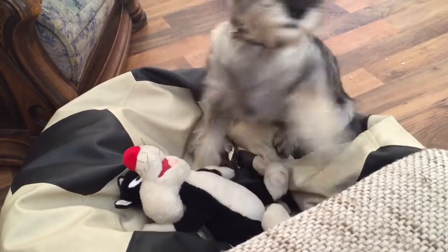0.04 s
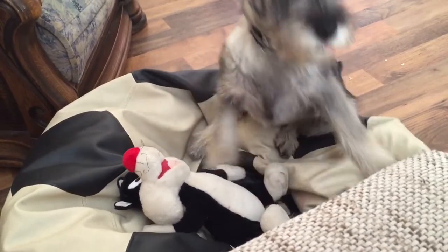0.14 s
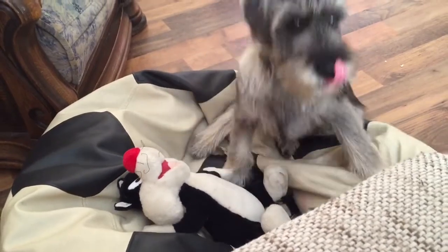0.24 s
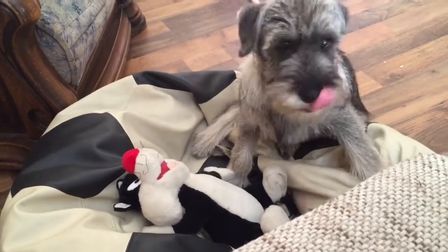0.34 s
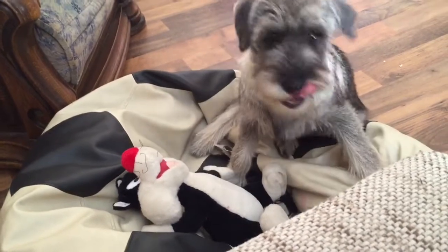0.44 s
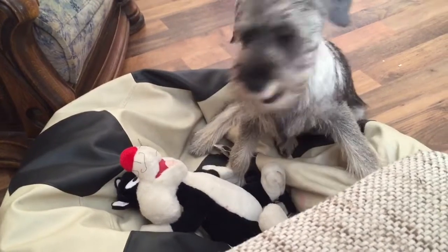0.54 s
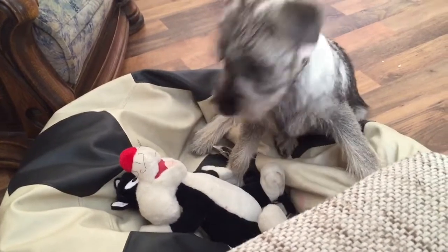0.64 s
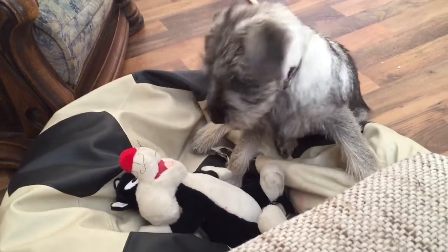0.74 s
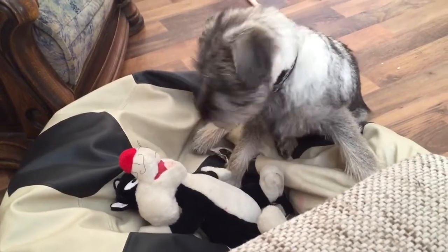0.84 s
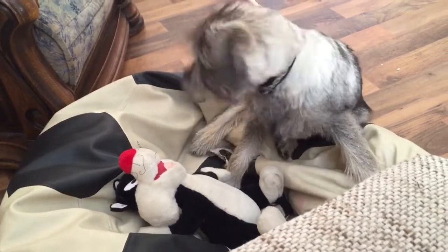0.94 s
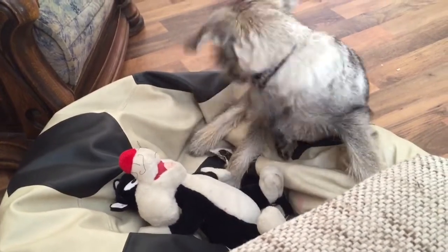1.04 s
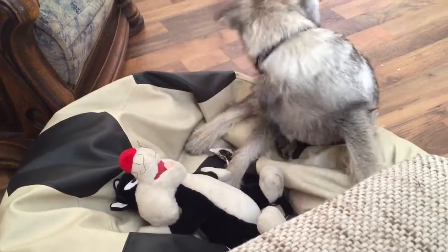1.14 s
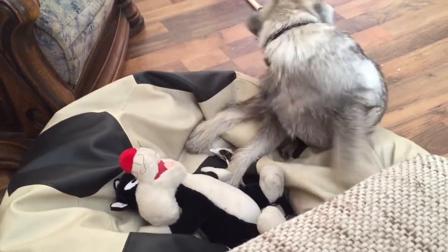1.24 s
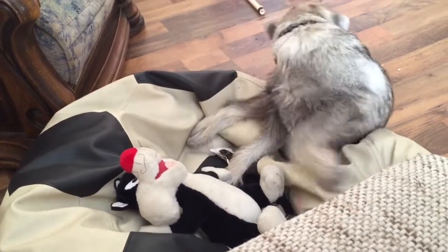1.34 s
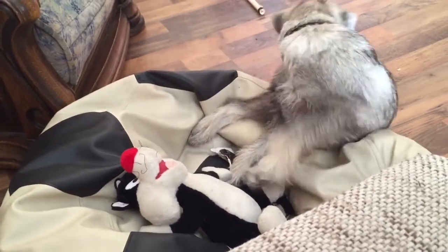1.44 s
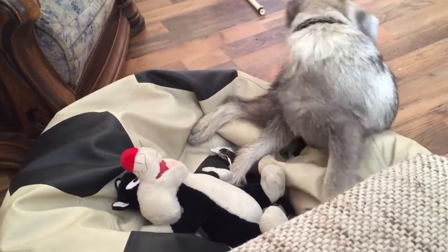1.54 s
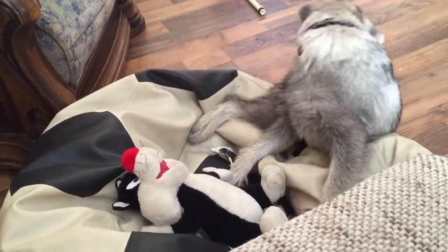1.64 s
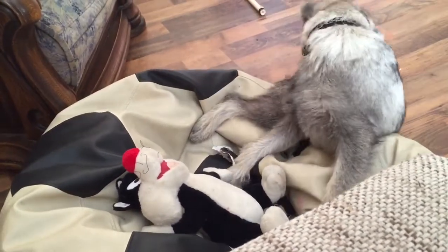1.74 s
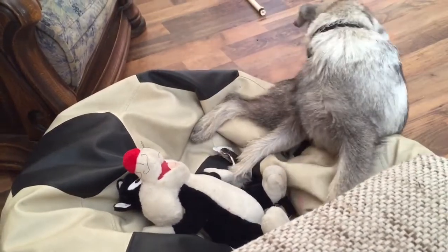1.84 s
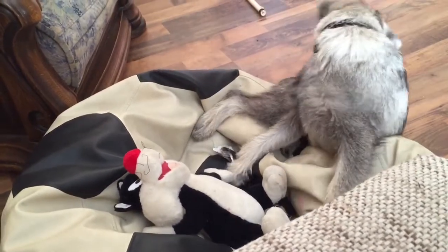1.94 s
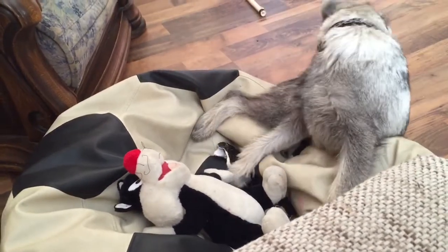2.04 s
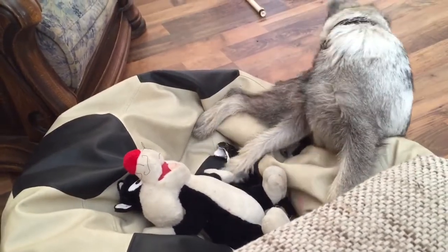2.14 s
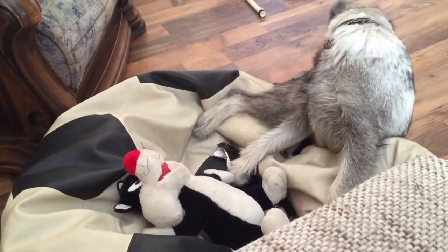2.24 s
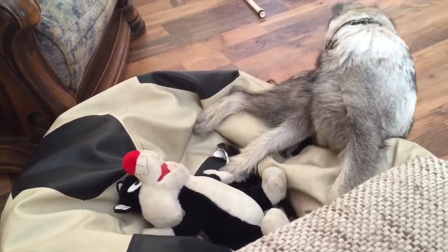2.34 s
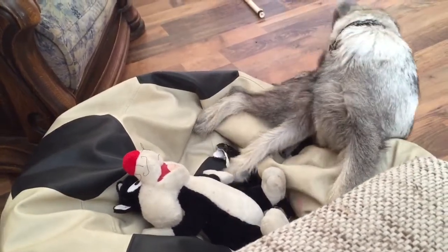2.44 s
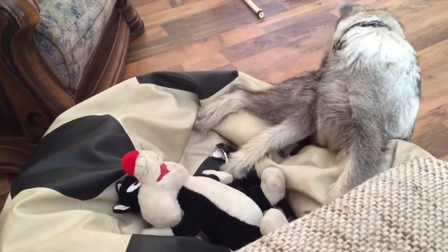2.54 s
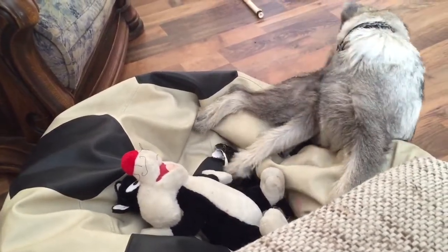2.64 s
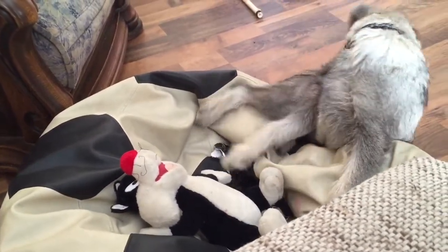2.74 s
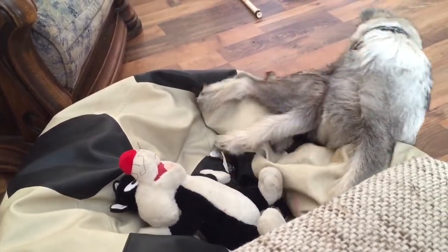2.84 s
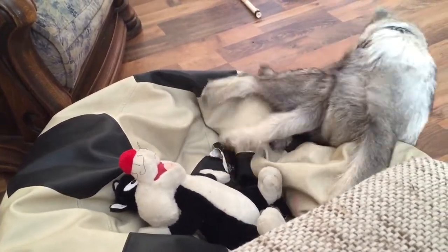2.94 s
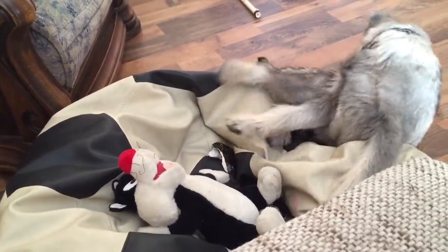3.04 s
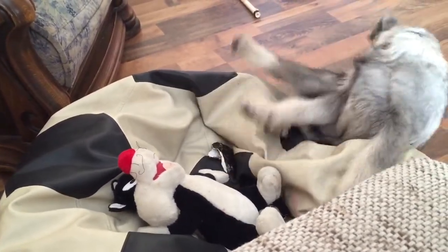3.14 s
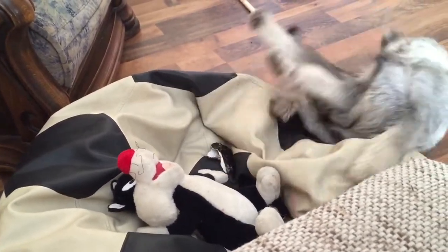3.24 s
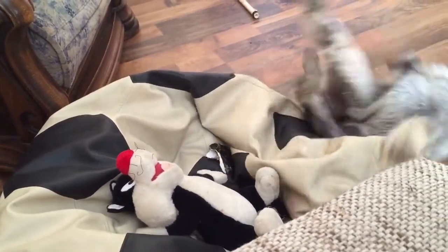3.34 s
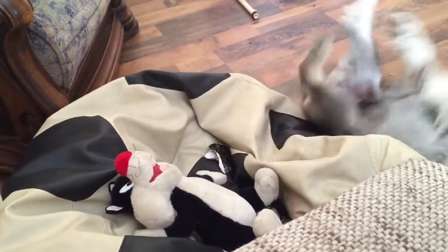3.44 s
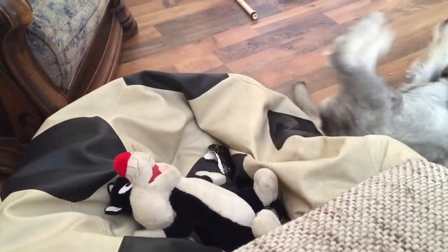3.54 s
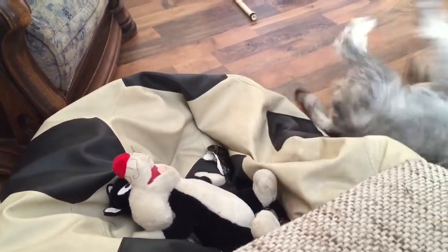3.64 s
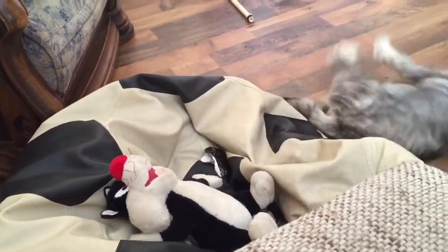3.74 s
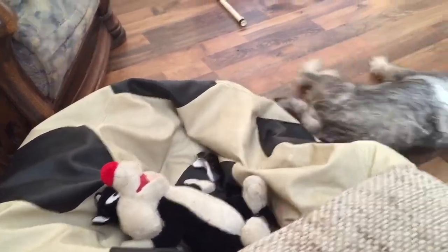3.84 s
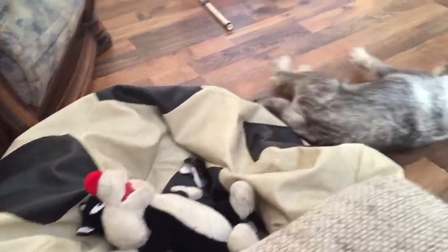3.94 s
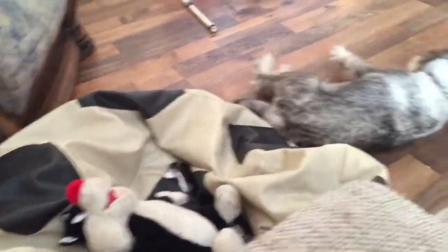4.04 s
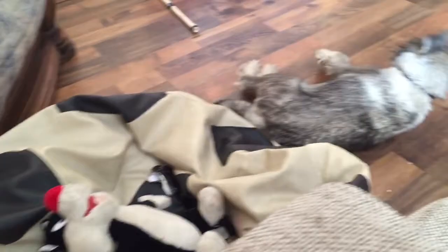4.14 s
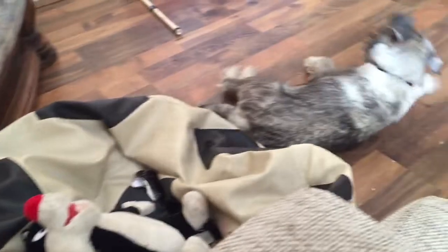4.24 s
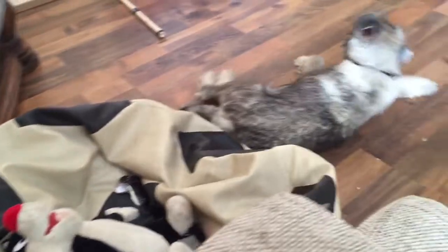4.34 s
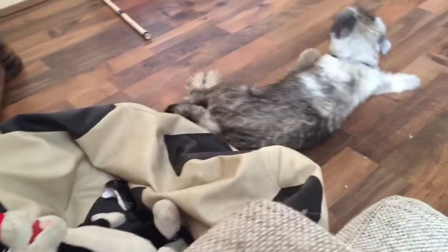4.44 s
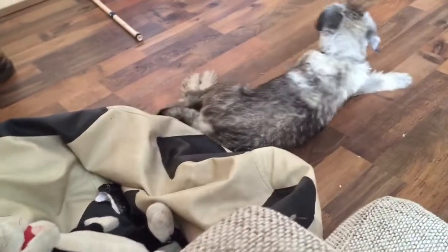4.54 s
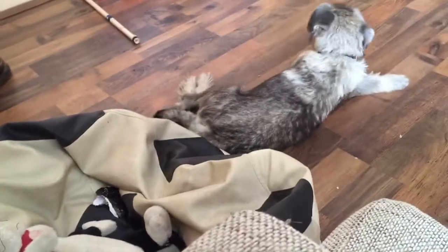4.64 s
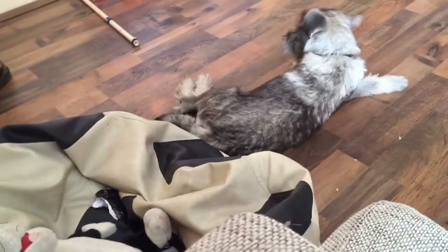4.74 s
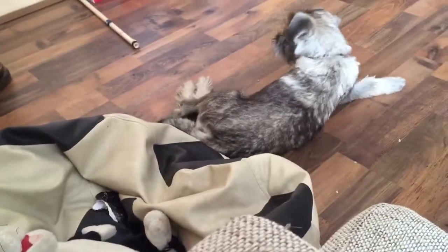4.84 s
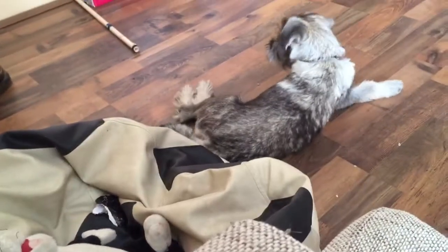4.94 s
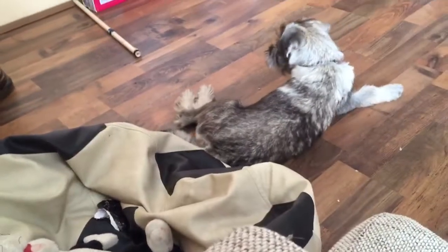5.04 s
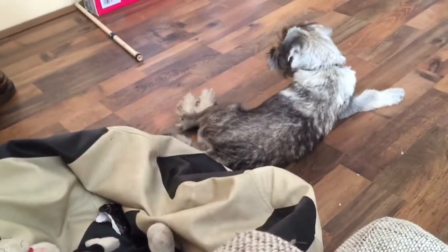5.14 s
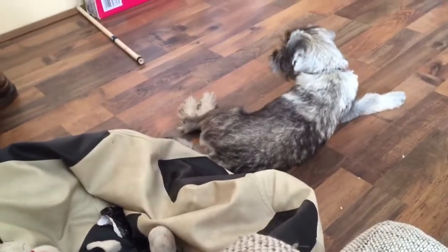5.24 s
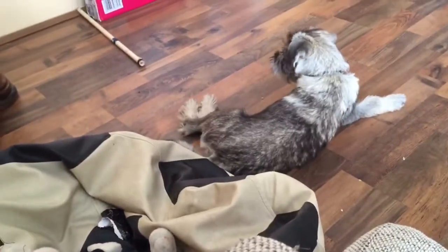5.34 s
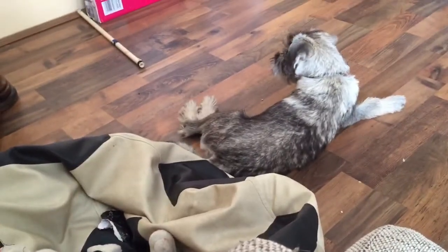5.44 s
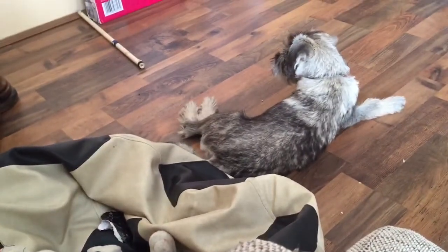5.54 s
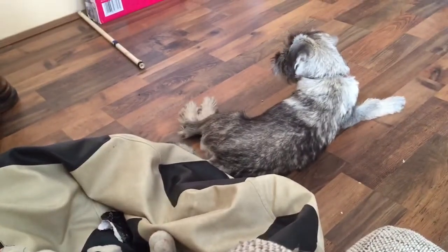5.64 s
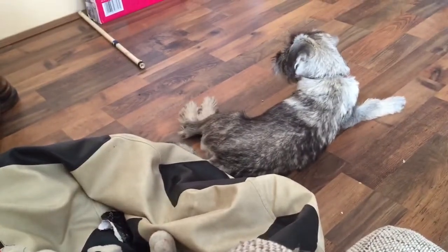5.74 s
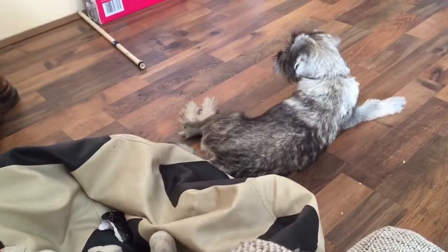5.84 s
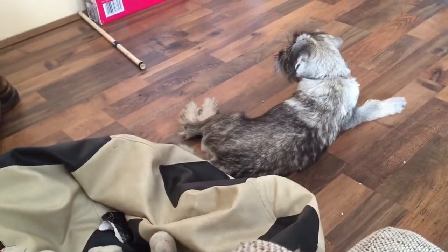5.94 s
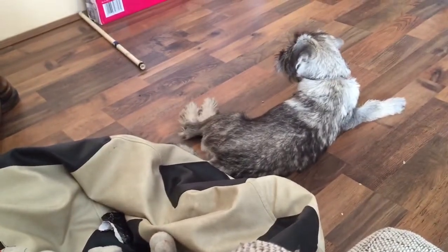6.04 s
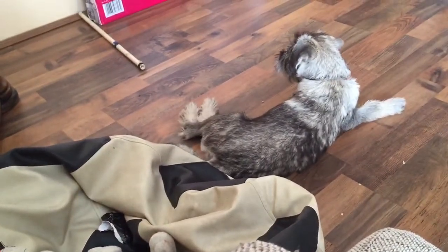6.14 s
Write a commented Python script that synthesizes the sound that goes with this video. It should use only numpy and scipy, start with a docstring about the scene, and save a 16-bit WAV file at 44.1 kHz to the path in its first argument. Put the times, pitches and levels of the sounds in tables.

```python
"""In a living room, a puppy shuffles about on a fabric bean bag, then drops onto the wooden floor.
Shaped noise and scattered tiny clicks make the sliding rub and the crunch of the filling; a sliding tone
makes a faint squeak. The landing is two knocks, built from short swings and ringing boards.
Light claw ticks follow: sharp noise with high pings. A soft coat swish, a faint hum and hiss lie underneath."""
import sys
import numpy as np
from scipy import signal
from scipy.fft import rfft, irfft
from scipy.io import wavfile

SR = 44100
rng = np.random.default_rng(int(sys.argv[2]) if len(sys.argv) > 2 else 0)


def int16_out(signal):
    """Quantize to a 16-bit WAV file."""
    q = np.round(np.clip(np.atleast_2d(signal).T, -1, 1) * 32767)
    wavfile.write(sys.argv[1], SR, q.astype(np.int16))


N = 273331
TIME = np.arange(N) / SR   # seconds

# Levels here are starting levels; the functions below mix them further.
# t60_s is the time a sound takes to fade by 60 dB. Spectra are relative: they set only the colour.

# Each move makes a sliding rub, on the cover and in the last row on the floor:
# start_s, attack_s, hold_s, rub_t60_s, rub_db, rasp_db
STROKES = [(-.02, 0.0083, 0.0059, 1.27, -51.5, -64), (0.213, 0.022, 0.18, 0.77, -49.5, -57.5),
           (0.542, .04, 0.021, 0.23, -58, -93.5), (0.705, 0.082, 0.1, 0.47, -55.5, -71.5),
           (1.185, 0.21, 0.056, 0.73, -52, -64.5), (1.448, .05, .015, 0.41, -58, -63.5),
           (1.62, 0.023, .06, 0.32, -53, -61.5), (1.926, 0.088, 0.051, 0.22, -63.5, -74.5),
           (2.36, 0.033, .02, 0.21, -68, -73), (2.564, .03, 0.023, 0.49, -63, -76),
           (2.805, 0.063, .08, 0.45, -54, -64.5), (3.05, 0.0099, 0.06, 2, -57, -72),
           (3.145, 0.12, 0.066, .8, -53.5, -65.5), (3.34, 0.054, 0.091, 0.79, -51.5, -63.5),
           (4.165, 0.047, 0.23, .8, -77, -81.5)]
RASP_RELEASE = 0.66   # the rasp dies sooner than the rub: share of its t60
HEAVE_DB, FUR_DB = -12, -13   # the heaving against the rub; fur's hiss against the rasp
# Fur brushing, on the cover and at last on the floor: start_s, hold_s, level_db
BRUSHES = [(0.292, .03, -59), (.42, .03, -70), (1.608, 0.0091, -62), (2.06, .01, -70.5), (2.377, .01, -81),
           (2.845, 0.038, -64), (3.078, 0.025, -75), (4.36, .015, -75)]
BRUSH_ATTACK_S, BRUSH_T60_S = 0.031, 0.25
# The cover never lies quite still while the puppy is on it
ON_BAG_UNTIL_S, SETTLE_T60_S = 3.6, 3.0
FIDGET_RUB_DB, FIDGET_RASP_DB, FIDGET_FUR_DB = -68.5, -78, -83.5
CRACKLE_DB, CRACKLES_PER_S = -16, 130   # coarse slips of the filling, against the rub
# Colours of the soft rub, its crisp rasp, the fur and the filling: pitch_hz, level_db_per_hz
CLOTH_SPECTRUM = [(150, -5.5), (260, 6), (350, 5.5), (430, 9), (520, -2.5), (660, 2), (1200, -2.5),
                  (2100, -2.5), (2800, -10), (4000, -26), (8000, -29), (14000, -42.5)]
RASP_SPECTRUM = [(1500, -3), (2600, 3), (3900, 4), (5000, -4), (6500, -5), (8000, -18), (14000, -22.5)]
FUR_SPECTRUM = [(1500, -9), (3500, 1.5), (6000, 3), (8500, 5), (10400, -1.5), (12500, 2.5), (15500, 2)]
FILLING_SPECTRUM = [(280, 2.5), (500, 5), (1200, 10.5), (2300, -4.5), (3500, -7.5), (6000, -16.5),
                    (14000, -48)]
# The sofa close by mirrors the rustle: delay_s, level_db
NEAR_ECHOES = [(.0023, -53), (.0061, -16), (0.0137, -13.5)]

# Paws pushing into the bag: start_s, thud_db, thud_pitch_hz, crunch_db, t60_s
PAWS = [(0.2219, -39.5, 240, -42, 0.12), (0.2312, -43, 201, -41, 0.27), (0.3212, -50, 268, -57, 0.51),
        (0.35, -62, 111, -51, 0.2), (1.049, -58, 128, -79, 0.15), (1.205, -54, 110.2, -78, 0.057),
        (1.633, -38.5, 214.3, -38, 0.2), (2.042, -53, 332.6, -64, 0.14), (2.063, -53.5, 330, -62, 0.1),
        (2.586, -75, 300, -65, .08), (3.069, -59, 250, -55.5, 0.09)]
# Colours of the dull thud and of the crunch: pitch_hz, level_db_per_hz
THUD_SPECTRUM = [(30, -34.5), (58, -19), (90, 4), (120, 0), (152, -11), (200, 3), (260, -7), (350, -0.5),
                 (500, -17), (900, -59.5)]
CRUNCH_SPECTRUM = [(185, 14), (340, 12.5), (480, -7), (650, 5.5), (950, 1.5), (1300, -4), (2300, 1.5),
                   (4000, -10.5), (7000, -21), (14000, -68)]

# Folds of the cover snapping taut: start_s, level_db, t60_s
SNAPS = [(0.2228, -56, 0.017), (0.2375, -44, 0.04), (0.3213, -31, 0.022), (0.478, -52, 0.026),
         (0.578, -58, 0.017), (1.127, -73, 0.033), (1.633, -49, 0.044), (2.095, -68, 0.019),
         (3.3324, -58, .015)]
# Colour of a snap: pitch_hz, level_db_per_hz
SNAP_SPECTRUM = [(300, 18), (1000, 9.5), (2300, 0), (4500, 5.5), (8000, -3), (10500, -11), (15000, -4)]
# One faint falling squeak: start_s, length_s, level_db, first_pitch_hz, last_pitch_hz
SQUEAK = (1.99, .1, -70, 1680, 1270)

# Pulses that together build the two knocks on the floor:
# start_s, knock_db, knock_pitch_hz, cycles_to_crest (a count), crack_db, weight_db
LANDING = [(3.5088, -37.5, 920, 0.57, -70, -67.5), (3.5207, -23.5, 710, 0.76, -67.5, -32.5),
           (3.5221, -29, 385, 0.33, -82, -34), (3.535, -39.5, 127, 0.85, -75, -36.5),
           (3.557, -43, 650, 1.3, -48, -47.5), (3.7145, -18, 744, 1.14, -34, -35.5),
           (3.7241, -22, 698, 1, -57, -45), (3.7465, -33, 660, 1.4, -48.5, -44)]
# Low notes of the floor and room: pitch_hz, level_db, t60_s
FLOOR_MODES = [(39.33, -16.5, 1.237), (67.9, -8, 0.138), (86, -10, 0.59), (111, -3, .35),
               (135.4, -9.5, 0.52), (168, -2.5, 0.24), (211.1, -0.5, 0.41), (231, -3.5, 0.33),
               (284.5, 0, 0.26), (306.6, -13, 0.37), (344, -19.5, 0.45), (347, -3.5, .4), (427, -9, 0.34)]
# Ringing notes of the boards: pitch_hz, level_db, t60_s
BOARD_MODES = [(519.5, -2.5, 0.46), (551, -3.5, 0.5), (617, -9.5, 0.48), (660, -15.5, 0.38),
               (694, -18, 0.42), (794, -12, 0.61), (805, -20, 0.48), (830, -16, 0.57), (948, -10, .42),
               (1103, -8.5, 0.402), (1720, -18.5, .4), (1824, -21, 0.38), (2274, -22, 0.497),
               (2397, -21.5, .6)]
# Colours of the sharp crack and of a knock's blurred wooden tail: pitch_hz, level_db_per_hz
CRACK_SPECTRUM = [(900, 3.5), (1350, 2.5), (1700, 4.5), (2000, -7), (2300, 7), (2550, -5.5), (3100, -4.5),
                  (4300, -14), (5500, -23.5), (14000, -45.5)]
WOOD_SPECTRUM = [(250, -8.5), (320, -1.5), (480, -8.5), (550, -2), (670, 5), (760, -3), (950, -8),
                 (1100, -9.5), (1350, -26), (1700, -24), (2000, -45), (2400, -29), (3300, -34),
                 (4500, -35.5), (14000, -65)]
# Furniture and walls throwing the knocks back: delay_s, level_db
ECHOES = [(.0031, -2), (.0055, -14), (.0118, -16.5), (0.0355, -24), (.0485, -37.5)]

# The floor sways as the body rolls across it: start_s, attack_s, hold_s, t60_s, level_db
ROLLS = [(3.46, .1, 0.15, 0.73, -53), (3.8, 0.046, .1, 0.28, -59.5)]
# Colour of the rumble around that sway: pitch_hz, level_db_per_hz
RUMBLE_SPECTRUM = [(33, -14), (42, -0.5), (52, 0.5), (65, -9), (120, -19.5), (400, -63)]
SWAY_HZ, RUMBLE_DB = 39.7, -6   # the floor's deep note; the rumble against it

# The coat slides off the bag and over the boards: start_s, attack_s, hold_s, t60_s, level_db
SWISH = (1.5, .5, 1.94, 4.5, -80.5)
# Colour of that swish: pitch_hz, level_db_per_hz
COAT_SPECTRUM = [(3500, -4), (4900, -8.5), (5700, 1), (7000, -3.5), (8200, 0.5), (9500, 2), (10300, -15),
                 (15000, -24)]

# Claws ticking on the boards: start_s, click_db, ping_db, ping_pitch_hz
CLAWS = [(3.551, -52.5, -55, 3560), (3.563, -53.5, -76, 4250), (3.9029, -50.5, -54.5, 3160),
         (3.9054, -59, -50.5, 4430), (3.9135, -73, -56, 3240), (3.949, -55.5, -68, 5600),
         (3.9553, -52, -49, 4080)]
# Colour of a claw's click: pitch_hz, level_db_per_hz
CLAW_SPECTRUM = [(1000, -2.5), (1600, -8), (2400, -17.5), (3200, -3.5), (3550, -1.5), (3900, 3), (4400, -1),
                 (4950, -9), (5700, -4), (6600, -10.5), (9500, -18), (14000, -33)]

# Fading of the room's reverberation: pitch_hz, t60_s
ROOM_T60 = [(60, 0.4), (250, 0.27), (700, 0.63), (2000, 0.66), (5000, 0.42), (14000, 0.096)]
# Appliance hum: pitch_hz, level_db (rms)
HUM = [(98, -87.5), (199, -78.5)]
# Colour of the still air: pitch_hz, level_db_per_hz
AIR_SPECTRUM = [(15, -54), (25, -18.5), (69, -7), (93, -6.5), (109, 0.5), (131, -13.5), (202, -4),
                (231, -21), (271, -11.5), (373, -17.5), (404, -21), (637, -20), (1060, -24), (1810, -24.5),
                (15000, -36)]
AIR_DB = -69.5
CUTOFF_HZ = 15250


def rustle():
    """Each move rubs in tiny slips, with brushing fur, a low heaving and coarse crackle."""
    fidget = from_db(-60 * np.maximum(TIME - ON_BAG_UNTIL_S, 0) / SETTLE_T60_S)

    rubs = [swell(s, attack, hold, t60, db) for s, attack, hold, t60, db, _ in STROKES]
    rub = together(rubs + [from_db(FIDGET_RUB_DB) * fidget])
    rasps = [swell(s, attack, hold, RASP_RELEASE * t60, db) for s, attack, hold, t60, _, db in STROKES]
    rasp = together(rasps + [from_db(FIDGET_RASP_DB) * fidget])
    sweeps = [swell(s, BRUSH_ATTACK_S, hold, BRUSH_T60_S, db) for s, hold, db in BRUSHES]
    brush = together(sweeps + [from_db(FUR_DB) * rasp, from_db(FIDGET_FUR_DB) * fidget])

    soft_slips = rub * grains(CLOTH_SPECTRUM, per_s=3000, spread_db=0.0)
    crisp_slips = rasp * grains(RASP_SPECTRUM, per_s=3000, spread_db=-1.0)
    catching = flutter(per_s=110, depth_db=1.0)   # the rub sticks and lets go
    rubbing = catching * (soft_slips + crisp_slips)
    crackle = from_db(CRACKLE_DB) * rub * grains(FILLING_SPECTRUM, per_s=CRACKLES_PER_S, spread_db=3)
    sliding = rubbing + crackle

    hairs = grains(FUR_SPECTRUM, per_s=2500, spread_db=3)
    fur = brush * hairs * flutter(per_s=80, depth_db=1.7)
    heaving = from_db(HEAVE_DB) * rub * hiss(THUD_SPECTRUM)
    return sliding + reflections(sliding, NEAR_ECHOES) + fur + heaving


def paws(tail):
    """Each push swings the bag, sends a dull thud into the floor and crunches the filling together."""
    thud_shape = sum(burst(s, db, t60, rise_s=0.011) for s, db, _, _, t60 in PAWS)
    thud = thud_shape * hiss(THUD_SPECTRUM)
    swing = sum(knock(s, db, hz, cycles=0.23) for s, db, hz, _, _ in PAWS)
    floor = ring(sum(click(s, db) for s, db, *_ in PAWS), FLOOR_MODES)
    crunch_shape = sum(burst(s, db, t60, rise_s=0.0008) for s, _, _, db, t60 in PAWS)
    crunch = crunch_shape * grains(CRUNCH_SPECTRUM, per_s=2000, spread_db=5.5)
    push = from_db(0.5) * thud + from_db(4.5) * swing + from_db(-12) * floor
    return push + in_room(crunch, tail, wet_db=-8.5)


def snaps(tail):
    """Folds of cloth pull taut with short sharp bursts of noise."""
    return in_room(ticks(SNAPS, SNAP_SPECTRUM), tail, wet_db=-6.5)


def squeak():
    """A thin tone slides down in pitch as the puppy shifts."""
    s, length, db, first_hz, last_hz = SQUEAK
    along = np.clip((TIME - s) / length, 0, 1)
    hz = first_hz + (last_hz - first_hz) * along
    arch = 2 * np.sqrt(along * (1 - along))   # silent at both ends, full in the middle
    return from_db(db) * arch * np.sin(2 * np.pi * np.cumsum(hz) / SR)


def landing(tail):
    """Pulses together build the two knocks; the body's weight sets the whole floor booming."""
    knocks = sum(knock(s, db, hz, cycles) for s, db, hz, cycles, _, _ in LANDING)
    cracks = ticks([(s, db, 0.025) for s, _, _, _, db, _ in LANDING], CRACK_SPECTRUM)
    # strong pulses set the boards ringing far more than weak ones
    strengths = [(s, 1.76 * db) for s, db, *_ in LANDING]
    boards = ring(sum(click(s, db) for s, db in strengths), BOARD_MODES)
    wood_shape = sum(burst(s, db, t60=0.58, rise_s=0.014) for s, db in strengths)
    wood = wood_shape * hiss(WOOD_SPECTRUM)
    boom = ring(sum(click(s, db) for s, *_, db in LANDING), FLOOR_MODES)
    contact = knocks + in_room(cracks, tail, wet_db=-1.5) + reflections(knocks + cracks, ECHOES)
    return contact + from_db(-6.5) * boards + from_db(-3.0) * wood + from_db(-7.5) * boom


def roll():
    """The rolling weight keeps the floor swaying on a deep note with rumble around it."""
    weight = together([swell(*row) for row in ROLLS])
    drift_rad = 0.2 * np.log(10) * wander(per_s=14)   # makes the note waver
    sway = np.sqrt(2) * np.sin(2 * np.pi * SWAY_HZ * TIME + drift_rad)
    return weight * (sway + from_db(RUMBLE_DB) * hiss(RUMBLE_SPECTRUM))


def claws(tail):
    """Each claw clicks and gives a brief high ping."""
    clicks = ticks([(s, db, 0.028) for s, db, _, _ in CLAWS], CLAW_SPECTRUM)
    pings = sum(knock(s, db, hz, cycles=12.0) for s, _, db, hz in CLAWS)
    return in_room(clicks, tail, wet_db=-4.0) + pings


def coat_swish():
    """The sliding coat is a high noise that slowly swells and dies away."""
    return swell(*SWISH) * hiss(COAT_SPECTRUM)


def appliance_hum():
    """Low steady tones waver a little in phase and level."""
    hum = np.zeros(N)
    for hz, db in HUM:
        drift_rad = 0.65 * np.log(10) * wander(per_s=11)
        hum += from_db(db) * np.sqrt(2) * np.sin(2 * np.pi * hz * TIME + drift_rad)
    return hum * flutter(per_s=9.43, depth_db=1.5)


def still_air():
    """The air is a faint, steady coloured noise."""
    return from_db(AIR_DB) * hiss(AIR_SPECTRUM)


def reverberation():
    """The room's blurred answer to a click: bands of noise, each dying at its own rate; energy 1."""
    age, bands = TIME[:SR], []
    edges = np.geomspace(40, 16000, 10)
    for low, high in zip(edges, edges[1:]):
        band_filter = signal.butter(2, [low, high], "band", fs=SR, output="sos")
        band = signal.sosfilt(band_filter, rng.standard_normal(SR))
        t60 = at_hz(ROOM_T60, np.sqrt(low * high))
        bands.append(band * np.exp(-np.log(1000) * age / t60))
    build_up = 1 - np.exp(-age / 0.0022)
    return rms_one(sum(bands) * build_up) / np.sqrt(SR)


def in_room(x, tail, wet_db):
    """Add the room's reverberation to a sound."""
    return x + from_db(wet_db) * signal.fftconvolve(x, tail)[:N]


def reflections(x, echoes):
    """Nearby surfaces throw a sound back a few times, later and at other levels."""
    return sum(from_db(db) * np.interp(TIME - delay, TIME, x, left=0) for delay, db in echoes)


def knock(s, db, hz, cycles):
    """A pulse swings at its own pitch, swelling quickly and dying away."""
    swing = np.clip((TIME - s) * hz, 0, 20 * cycles)   # cycles since the start
    shape = (swing / cycles * np.exp(1 - swing / cycles)) ** 2   # crest after the given cycles
    return from_db(db) * shape * np.sin(2 * np.pi * swing)


def ring(x, modes):
    """A unit click sets each mode ringing at its own height, signs alternating."""
    out = np.zeros(N)
    for k, (hz, db, t60) in enumerate(modes):
        r = np.exp(-np.log(1000) / (t60 * SR))   # fading per sample
        w = 2 * np.pi * hz / SR                  # turn per sample
        # the tiny offset keeps the filter's numbers away from zero
        mode = signal.lfilter([0, np.sin(w)], [1, -2 * r * np.cos(w), r * r], x + 1e-18)
        out += (-1) ** k * from_db(db) * mode
    return out


def ticks(rows, spectrum):
    """Short sharp contacts are noise with a very quick rise."""
    return sum(burst(s, db, t60, rise_s=0.00025) for s, db, t60 in rows) * hiss(spectrum)


def click(s, db):
    """A click is a single sample."""
    return from_db(db) * (np.arange(N) == round(s * SR))


def burst(s, db, t60, rise_s):
    """A burst's envelope rises quickly and falls exponentially."""
    age = np.clip(TIME - s, 0, 2 * t60)
    return from_db(db) * (1 - np.exp(-age / rise_s)) * np.exp(-np.log(1000) * age / t60)


def swell(s, attack_s, hold_s, t60, db):
    """A movement's envelope gathers speed, holds and dies away."""
    rise = np.clip((TIME - s) / attack_s, 0, 1)
    since_end = np.clip(TIME - s - attack_s - hold_s, 0, 2 * t60)
    return from_db(db) * rise * np.exp(-np.log(1000) * since_end / t60)


def together(gains):
    """Unrelated noises add in power."""
    return np.sqrt(sum(gain ** 2 for gain in gains))


def wander(per_s):
    """Random values, per_s of them each second, joined by straight lines."""
    return np.interp(TIME * per_s, np.arange(N), rng.standard_normal(N))


def flutter(per_s, depth_db):
    """A gain wanders at random."""
    return from_db(depth_db * wander(per_s))


def grains(spectrum, per_s, spread_db):
    """Many tiny slips of uneven size fall at random moments."""
    sizes = from_db(spread_db * np.clip(rng.standard_normal(N), -2, 2))
    signs = rng.choice([-1, 1], N)
    slips = rng.random(N) < per_s / SR
    return colour(sizes * signs * slips, spectrum)


def hiss(spectrum):
    """Smooth coloured noise."""
    return colour(rng.standard_normal(N), spectrum)


def colour(x, spectrum):
    """Give a steady noise a spectrum that falls away below its first point; rms 1."""
    hz = np.arange(N // 2 + 1) * SR / N
    skirt = np.minimum(hz / spectrum[0][0], 1) ** 2
    return rms_one(irfft(rfft(x) * from_db(at_hz(spectrum, hz)) * skirt, N))


def at_hz(points, hz):
    """Read a table between its points, with pitch on a log scale."""
    known_hz, values = np.transpose(points)
    return np.interp(np.log(np.maximum(hz, 1)), np.log(known_hz), values)


def rms_one(x):
    """Scale a sound to an rms level of 1."""
    return x / np.sqrt(np.mean(x ** 2) + 1e-20)


def from_db(db):
    """Turn decibels into a plain gain."""
    return 10 ** (np.asarray(db) / 20)


def scene():
    """The bag, the fall and the claws in a quiet room."""
    tail = reverberation()
    bag = rustle() + paws(tail) + snaps(tail) + squeak()
    fall = landing(tail) + roll() + claws(tail) + coat_swish()
    room = appliance_hum() + still_air()
    return (bag + fall + room)[None]   # one channel


def record(dry):
    """The microphone loses the deepest bass and the top is cut."""
    bass_cut = signal.butter(4, 30, "high", fs=SR, output="sos")
    top_cut = signal.ellip(10, 0.2, 70, CUTOFF_HZ, fs=SR, output="sos")
    return signal.sosfilt(top_cut, signal.sosfilt(bass_cut, dry))


dry = scene()
out = record(dry)
int16_out(out)
```